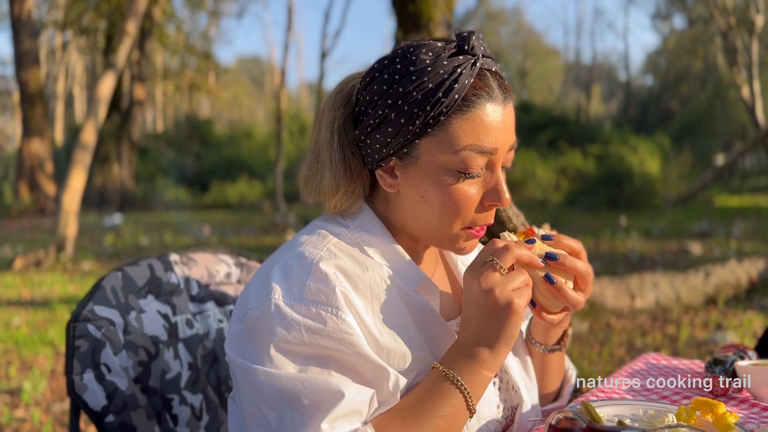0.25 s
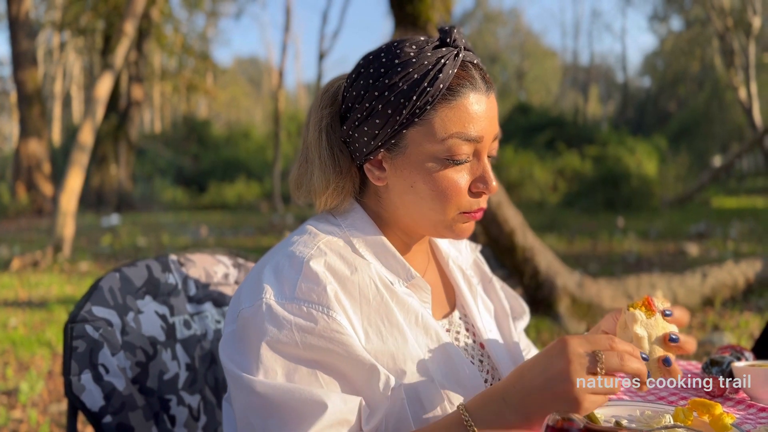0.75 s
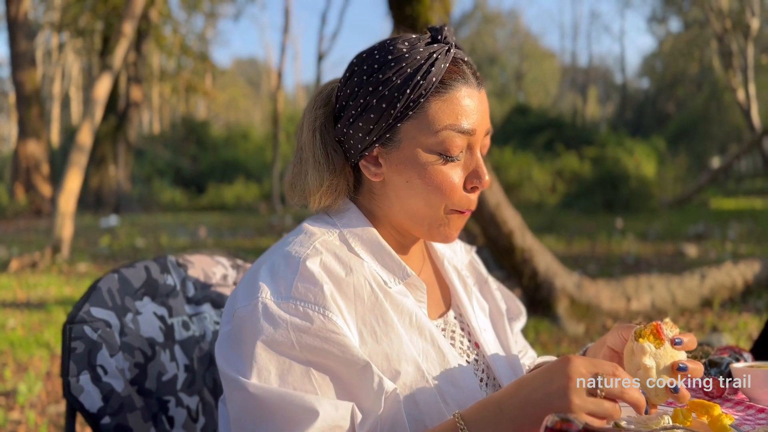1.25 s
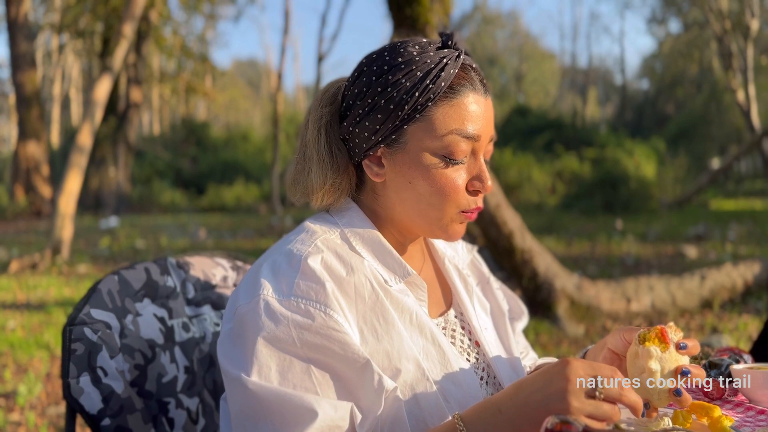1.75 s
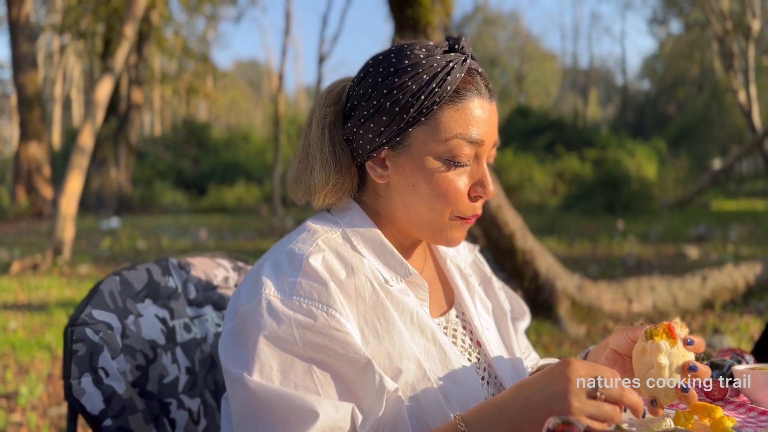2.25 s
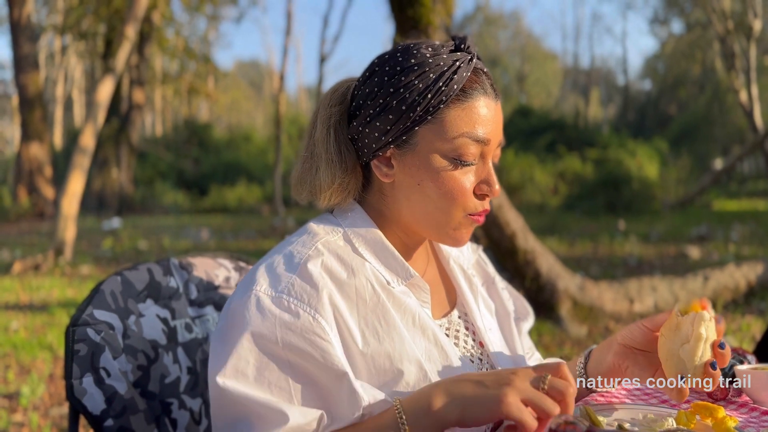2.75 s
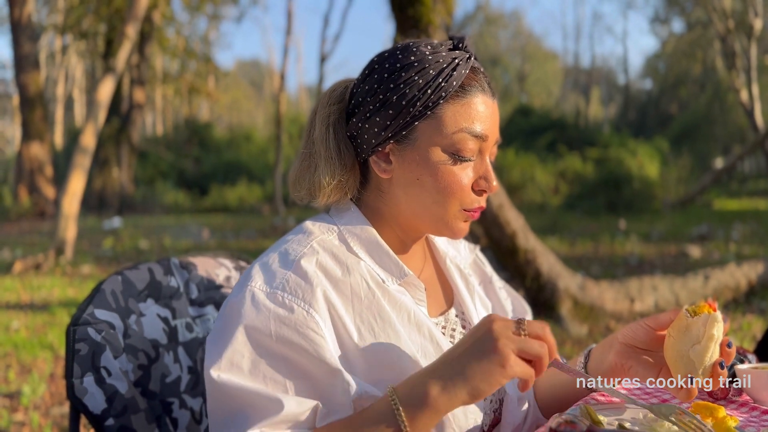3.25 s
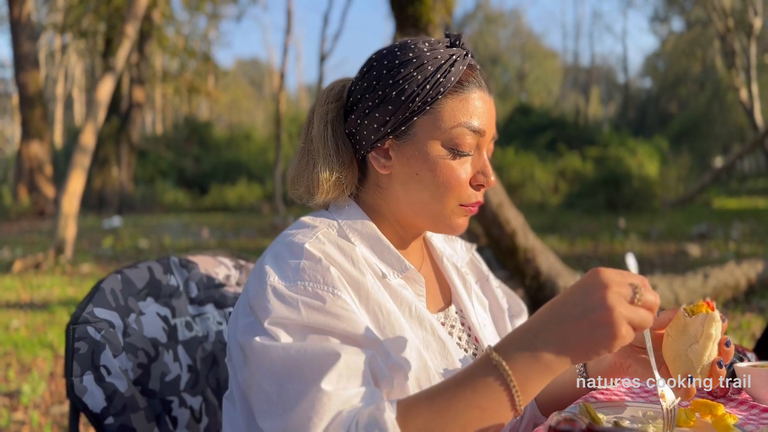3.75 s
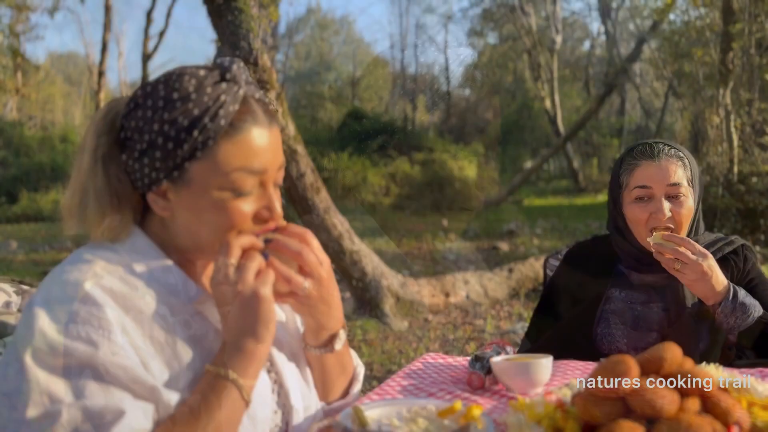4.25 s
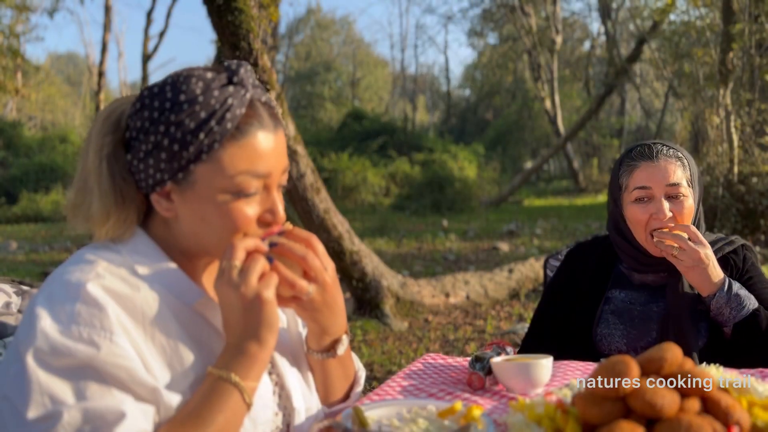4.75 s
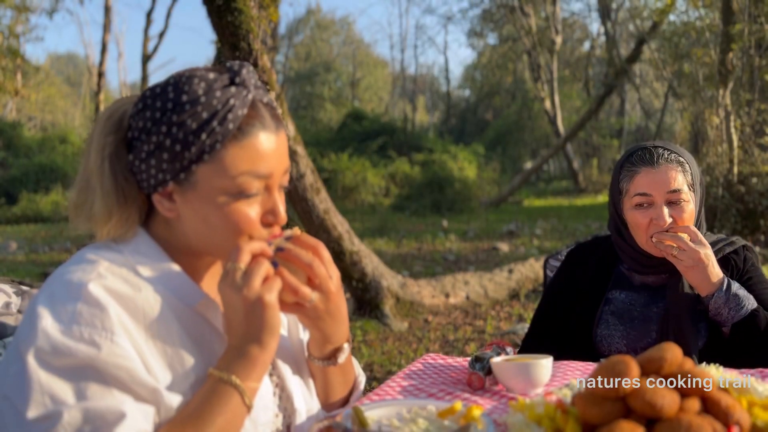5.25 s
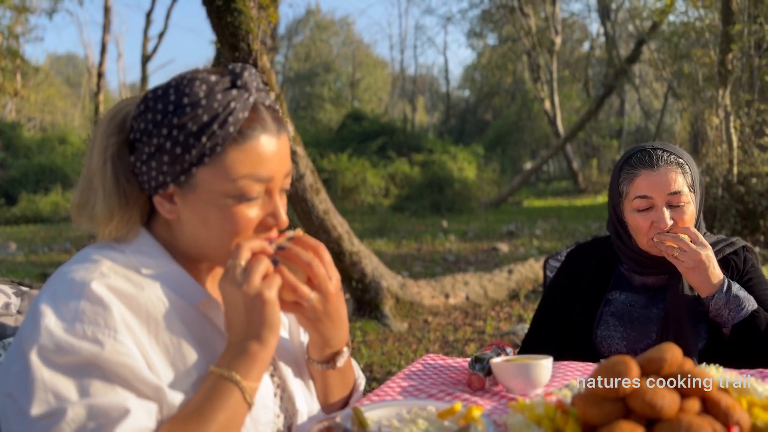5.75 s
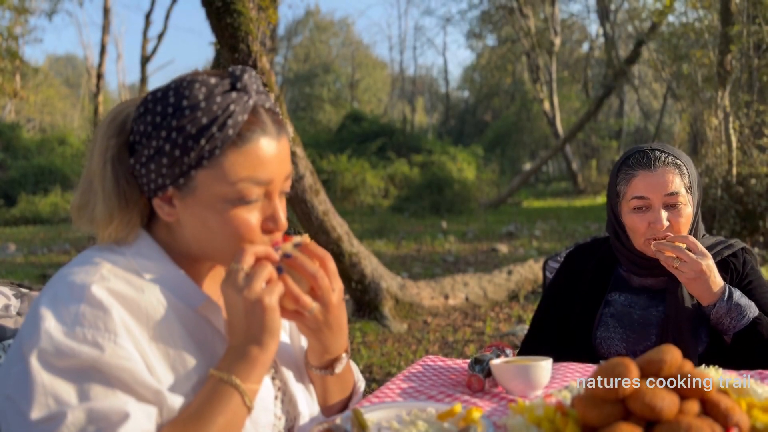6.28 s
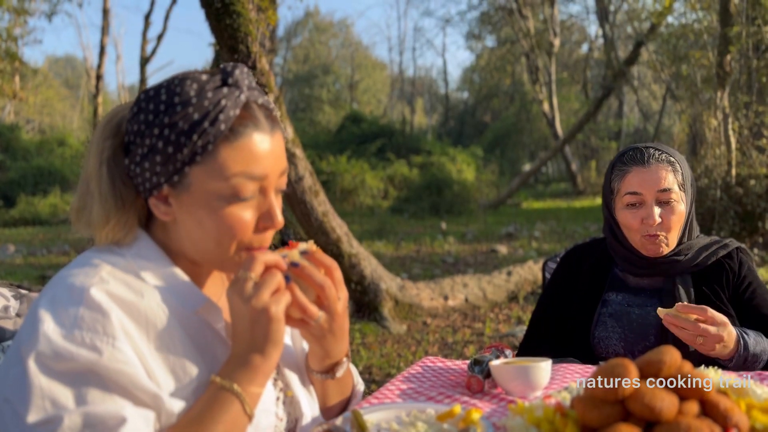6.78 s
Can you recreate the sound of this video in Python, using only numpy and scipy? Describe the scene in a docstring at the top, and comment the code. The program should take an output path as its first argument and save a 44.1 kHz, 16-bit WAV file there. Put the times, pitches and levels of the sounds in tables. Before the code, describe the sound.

Quiet woodland picnic: deep wind rumble and small table knocks first, then the rumble thins away while thin, high birdsong becomes busier.

```python
"""Birds around a woodland picnic table

Small birds near and far sing gliding, wavering sines that scatter among the trunks as dying noise.
Coloured noise makes the hiss of the wood, a dull far drone, light wind on the microphone and brushing cloth.
Short noise bursts tick on the table, rounded swings bump it, and deep sines throb in the rumble.
For about two seconds a sliding low-cut takes the rumble away."""
import sys
import numpy as np
from scipy import signal
from scipy.fft import rfft, irfft, next_fast_len
from scipy.io import wavfile

SR = 44100
rng = np.random.default_rng(int(sys.argv[2]) if len(sys.argv) > 2 else 0)


def invert_db(level):
    """Linear amplitude ratio for a level in decibels (20 dB per decade), elementwise."""
    return 10 ** (np.asarray(level, dtype=float) / 20)


def to_wav(s):
    """Save 16-bit WAV."""
    ch = np.atleast_2d(s).T  # columns
    pcm = np.round(np.clip(ch, -1, 1) * 32767)  # PCM
    wavfile.write(sys.argv[1], SR, pcm.astype(np.int16))


N = 309582  # samples

# Colour of the wood's background hiss. Each row: frequency in Hz, relative level in dB per Hz.
WOOD_COLOUR = [(100, -30.5), (200, -30), (300, -26), (400, -34.5), (800, -37.5), (1700, -45), (3300, -45.5),
               (4600, -40.5), (6200, -32), (8000, -44.5), (9200, -68.5), (11000, -98), (12000, -98),
               (13000, -66.5)]
WOOD_DB = -60
# Left-right likeness of every noise bed. Each row: frequency in Hz, correlation from -1 to 1.
LIKENESS = [(45, .93), (130, .82), (250, .88), (700, .4), (1400, -.1), (10000, -.15), (13000, .6)]
# Lean of every noise bed to the left. Each row: frequency in Hz, left over right in dB.
NOISE_LEAN = [(60, -1), (240, 1.0), (950, -2), (3770, 5.5), (15000, 6.5)]
# Colour of the dull far drone. Each row: frequency in Hz, relative level in dB per Hz.
DRONE_COLOUR = [(60, -0.5), (130, 9), (220, 2), (320, -40)]
# Fader of the drone. Each row: time in seconds, level in dB.
DRONE_LEVEL = [(0, -61.5), (4.5, -71), (6.5, -72), (6.7, -81)]
# Colour of wind on the microphone. Each row: frequency in Hz, relative level in dB per Hz.
RUMBLE_COLOUR = [(22, -31), (33, -24), (42, 3.5), (75, 4.5), (110, -6.5), (200, -14.5), (700, -64)]
# Gusts and lulls of the wind. Each row: time in seconds, rumble level in dB.
WIND_LEVEL = [(0, -49.5), (.62, -51), (.76, -43.5), (.9, -50), (2.05, -49), (2.25, -50.5), (2.4, -42),
              (2.65, -44), (2.9, -50.5), (4.05, -46.5), (4.3, -59), (4.6, -66.5), (6.6, -67.5), (7.02, -63)]
# Deep throbs in the rumble. Each row: start in seconds, length in seconds, peak in dB.
THROBS = [(1.795, 0.22, -43), (3.261, 0.11, -38), (6.703, .18, -44.5), (6.9, .12, -54)]
THROB_HZ = 50.3
# Soft bumps through the table. Each row: start in seconds, envelope peak in dB, pitch in Hz.
BUMPS = [(0.739, -30.5, 88), (2.667, -33.5, 105), (3.449, -37, 158), (3.692, -34.5, 90.4), (3.948, -37, 94),
         (4.023, -37, 126), (4.418, -43, 232), (4.49, -49, 191), (4.602, -44.5, 223), (4.76, -52.5, 200),
         (4.93, -51, 230), (5.244, -52, 263), (5.582, -52, 163), (6.029, -51, 198)]
# Colour of brushing cloth. Each row: frequency in Hz, relative level in dB per Hz.
CLOTH_COLOUR = [(250, -11), (500, -10.5), (1100, -6), (2200, -9.5), (3500, -19.5), (9000, -26.5),
                (12000, -81)]
# Strokes of hand and cloth. Each row: loudest moment, swell and fade in seconds, level in dB.
BRUSHES = [(.62, .16, 0.12, -62), (2.74, 0.31, 0.17, -65), (3.251, 0.14, 0.34, -68.5),
           (4.59, 0.076, 0.12, -69), (6.8, 0.017, 0.022, -68)]
# Small ticks. Each row: start in seconds, peak in dB, band centre in Hz, band width in octaves.
TICKS = [(0.838, -45.5, 3900, 0.57), (0.855, -51, 3680, 0.49), (1.094, -57, 3400, .4),
         (2.411, -58.5, 2300, 0.35), (2.682, -49, 1210, 1.3), (2.892, -61, 2800, 1.2),
         (3.166, -55.5, 2280, 0.31), (3.251, -33.5, 6940, 4.6), (3.251, -44, 14300, 0.31),
         (3.251, -43.5, 470, 0.48), (4.508, -56.5, 2280, 0.43), (4.565, -54, 4100, .4),
         (4.592, -50, 1540, 2.8), (4.937, -55.5, 2570, .6), (5.163, -55, 2060, 0.48),
         (6.742, -48.5, 2800, 1.2)]
TRUNKS_T60_S = 0.72

# Most bird tables share one layout: start and length in seconds, first and last pitch in Hz, peak in dB.
# These peaks hold before panning and flutter.
# Blurred calls at the edge of hearing, in that layout.
BLURRED = [(.525, .12, 2905, 2807, -73), (.545, 0.11, 2720, 2605, -77), (1.04, 0.082, 2950, 2650, -81),
           (1.51, 0.16, 4600, 4460, -76), (3.31, 0.1, 4280, 4174, -72.5), (4.35, 0.081, 5820, 6080, -70),
           (4.64, .12, 6260, 5700, -65.5), (4.84, 0.058, 6230, 5860, -70), (5.09, 0.091, 7340, 6460, -66.5),
           (5.32, 0.2, 2230, 2713, -74)]
# Unsteady twitter, in that layout.
TWITTER = [(4.3, 0.015, 3510, 4400, -64), (4.31, 0.029, 3030, 3340, -67), (4.317, 0.028, 4340, 4320, -60.5),
           (4.337, 0.016, 4280, 3620, -56), (4.348, 0.0091, 4630, 4800, -60), (4.366, .01, 4610, 3880, -56),
           (4.4, 0.039, 4306, 3874, -58.5), (4.53, 0.032, 2930, 3450, -86.5), (4.555, .04, 3035, 3760, -60)]
# Long buzzy calls. Each row: left over right in dB, echo send in dB, and a list of breakpoints.
# Each breakpoint: time in seconds, pitch in Hz, level in dB.
BUZZES = [(4.6, 3.9, [(2.72, 7560, -54), (2.8, 7740, -52), (2.88, 8060, -58.5), (2.95, 8220, -68)]),
          (0.5, 1.3, [(2.85, 7590, -53.5), (3.05, 7640, -50.5), (3.16, 7100, -75)]),
          (0.5, 1.8, [(5.03, 9050, -77), (5.07, 8680, -55), (5.18, 8010, -50), (5.22, 7410, -46.5)])]
# Buzzy two-voiced upward flicks. Each row: start in seconds, peak in dB.
FLICKS = [(3.182, -46.5), (3.413, -49.5)]
# Lower, then upper voice of a flick. Each row: first and last pitch in Hz.
FLICK_HZ = [(5400, 7300), (6200, 8600)]
# Lengths of the lower and upper voice, in seconds.
FLICK_S = [0.0158, .035]
FLICK_LAG_S = .003  # the lower voice enters later
# A far bird on the left with a two-voiced whistle. Each row: start in seconds, peak in dB.
PAIRS = [(.69, -69), (2.2, -72.5), (3.65, -71)]
# The two voices of that whistle. Each row: first and last pitch in Hz.
PAIR_HZ = [(4920, 5000), (5400, 5430)]
PAIR_S = .1
# A bird far among the trunks that falls, holds and steps up, in the shared layout.
FAR_PHRASE = [(1.2, 0.072, 4160, 4300, -79), (1.93, 0.042, 3280, 3140, -73), (1.98, .16, 3600, 3526, -77),
              (3.65, 0.04, 3970, 3540, -61.5), (3.69, 0.031, 3506, 3547, -59),
              (3.715, 0.056, 4000, 4086, -60)]
# Lower whistles from deeper in the wood, gently gliding or falling, in the shared layout.
MELLOW = [(.93, 0.14, 3570, 3470, -78), (1.012, 0.029, 3010, 3140, -65), (1.11, 0.078, 3950, 4060, -65.5),
          (4.618, 0.076, 3410, 3506, -59), (4.68, 0.038, 3760, 3800, -63),
          (4.713, 0.028, 3394, 3530, -46.5), (4.738, 0.018, 4400, 3850, -56),
          (4.76, 0.1, 3750, 3610, -62.5), (4.865, 0.025, 3420, 3200, -64), (5.13, 0.055, 3860, 3530, -65),
          (5.33, 0.061, 4090, 3900, -61), (5.37, 0.076, 3617, 3640, -66.5), (5.955, 0.08, 3620, 3046, -56),
          (6.93, 0.073, 3774, 3920, -63.5)]
# Lower whistles that climb, in the shared layout.
CLIMBS = [(1.045, .05, 3150, 3880, -67), (5.205, 0.021, 2860, 3660, -59.5), (5.215, 0.061, 3720, 4060, -56),
          (5.275, 0.013, 4200, 4860, -53)]
# High whistles, most of them nearly level, in the shared layout.
LEVEL_HIGH = [(4.36, .09, 7320, 7600, -62), (4.36, 0.069, 7310, 7120, -62), (4.714, .03, 8300, 7900, -46),
              (4.965, 0.058, 8550, 8280, -60), (5.89, 0.16, 8430, 6730, -70.5),
              (5.99, 0.36, 7720, 7430, -61), (6.1, 0.075, 7000, 6950, -60),
              (6.935, 0.087, 8290, 8340, -65.5)]
# Thin high whistles that fall, in the shared layout.
SEEPS = [(2.49, .23, 8590, 7600, -60), (3.95, 0.15, 8770, 8020, -67.5), (4.19, .074, 9250, 7850, -45.5),
         (4.62, .045, 8800, 8350, -64), (4.655, 0.058, 9220, 7950, -38.5), (4.905, .075, 9030, 8280, -57.5),
         (6.66, 0.13, 9300, 8730, -71), (6.77, .09, 8960, 8000, -65)]
# Quick whistles, nearly all dropping in pitch, in the shared layout.
DROPS = [(6.5, 0.044, 5780, 4130, -44), (6.665, 0.052, 6010, 2990, -48), (6.67, 0.027, 5410, 3020, -56),
         (6.67, 0.021, 5790, 5810, -52.5), (6.803, 0.019, 5710, 5290, -50), (6.805, .045, 5620, 3210, -50),
         (6.805, 0.039, 4840, 3010, -55)]
# Near calls. Each row: left over right in dB, echo send in dB, and a list of breakpoints.
# Each breakpoint: time in seconds, pitch in Hz, level in dB.
NEAR_CALLS = [(8, 3.5, [(5.69, 8190, -56), (5.7, 7330, -45), (5.715, 6520, -47), (5.73, 6320, -54)]),
              (24, -4, [(6.12, 6470, -53), (6.2, 6170, -54.5), (6.29, 5890, -58.5), (6.36, 5940, -57.5),
              (6.49, 6055, -56)])]

# Lag of the left side in the bass. Each row: frequency in Hz, phase in radians.
LEFT_LAG = [(45, .15), (130, .75), (300, .55), (700, 1.4), (1500, 0)]
# Slide of the low-cut. Each row: time in seconds, corner in Hz.
LOW_CUT = [(4.5, 29.2), (4.66, 161), (5.2, 160), (5.4, 260), (5.6, 126), (5.8, 194), (6.0, 104),
           (6.15, 207), (6.63, 164), (6.71, 30.6)]
TOP_HZ = 15760


def rms_one(x):
    """Scale to unit rms."""
    return x / np.sqrt(np.mean(x ** 2) + 1e-20)


def in_time(rows):
    """Read a (seconds, value) curve at every sample."""
    return np.interp(np.arange(N) / SR, *np.transpose(rows))


def at_hz(points, hz):
    """Read a (Hz, value) curve on a log-frequency axis."""
    curve_hz, values = np.transpose(points)
    return np.interp(np.log(hz), np.log(curve_hz), values)


def lean_left(db):
    """Gains of left and right, db apart."""
    return invert_db(np.array([[.5], [-.5]]) * db)


def drift(rate_hz, size=N):
    """Slow random motion of unit rms: noise through a two-pole low-pass, drawn every 40 samples."""
    r = np.exp(-80 * np.pi * rate_hz / SR)
    chance = rng.standard_normal(size // 40 + 2002)
    slow = signal.lfilter([1], [1, -2 * r, r * r], chance)[2000:]  # skip the filter's settling
    return np.interp(np.arange(size) / 40, np.arange(len(slow)), rms_one(slow))


def air_noise(colour, patchy_db, rate_hz):
    """Stereo noise of a given colour, in half-octave bands that flicker both together and alone."""
    size = next_fast_len(N)
    hz = np.maximum(np.fft.rfftfreq(size, 1 / SR), 1)
    alike = np.clip(at_hz(LIKENESS, hz), -1, 1)
    mid, side = rfft(rng.standard_normal((2, size))) * invert_db(at_hz(colour, hz))
    pair = np.sqrt(1 + alike) * mid + np.sqrt(1 - alike) * side * [[1], [-1]]
    pair = pair * lean_left(at_hz(NOISE_LEAN, hz))
    low_hz, high_hz = colour[0][0], colour[-1][0]
    step = np.clip(2 * np.log2(hz / low_hz), 0, 2 * np.log2(high_hz / low_hz))
    together = drift(rate_hz / 4)
    out = 0
    for k in range(int(step.max()) + 2):
        overlap = np.clip(1 - abs(step - k), 0, 1)  # neighbouring bands crossfade
        band = irfft(pair * overlap, size)[:, :N]
        out = out + band * invert_db(patchy_db * (2.2 * together + drift(rate_hz)))
    return rms_one(out)


def wood_hiss():
    """The wood's background with its far chorus: steady coloured noise, hissing in the treble."""
    return invert_db(WOOD_DB) * air_noise(WOOD_COLOUR, patchy_db=.8, rate_hz=3)


def far_drone():
    """A dull drone of low, patchy noise under a moving fader."""
    return invert_db(in_time(DRONE_LEVEL)) * air_noise(DRONE_COLOUR, patchy_db=3, rate_hz=14)


def wind():
    """Wind on the microphone: deep noise that swells with each gust."""
    return invert_db(in_time(WIND_LEVEL)) * air_noise(RUMBLE_COLOUR, patchy_db=0.5, rate_hz=30.0)


def throbs():
    """Several cycles of one deep sine that swell and fade."""
    out = np.zeros(N)
    for s, length_s, peak_db in THROBS:
        t = np.arange(round(length_s * SR)) / SR
        swell = np.sqrt(np.sin(np.pi * t / length_s))
        out[round(s * SR):][:len(t)] += invert_db(peak_db) * swell * np.sin(2 * np.pi * THROB_HZ * t)
    return out


def bumps(cycles=2.7):
    """A short rounded swing of the table top: a low sine that rises fast and dies away."""
    out = np.zeros(N)
    for s, peak_db, hz in BUMPS:
        t = np.arange(round(3 * cycles / hz * SR)) / SR
        rise = t * hz / (cycles / 4)
        envelope = rise * np.exp(1 - rise)  # peaks at 1
        out[round(s * SR):][:len(t)] += invert_db(peak_db) * envelope * np.sin(2 * np.pi * hz * t)
    return out


def brushing_cloth():
    """Hands and cloth: noise whose strokes swell and fade, down 20 dB at the swell and fade times."""
    t = np.arange(N) / SR
    strokes = 0
    for s, swell_s, fade_s, level_db in BRUSHES:
        away = np.where(t < s, (s - t) / swell_s, (t - s) / fade_s)
        strokes = strokes + invert_db(level_db - 20 * away ** 2.4)
    return strokes * air_noise(CLOTH_COLOUR, patchy_db=1.5, rate_hz=13)


def ticks(decay_s=0.002):
    """A burst of noise dying in a couple of milliseconds, in a band of its own."""
    out = np.zeros(N)
    decay = np.exp(-np.arange(1024) / SR / decay_s)
    for s, peak_db, hz, octaves in TICKS:
        band = np.clip(hz * 2 ** (np.array([-.5, .5]) * octaves), 50, .45 * SR)
        band_pass = signal.butter(2, band, "band", fs=SR, output="sos")
        tick = signal.sosfilt(band_pass, rng.standard_normal(1024) * decay)
        out[round(s * SR):][:1024] += invert_db(peak_db) * tick / abs(tick).max()
    return out


def scatter(x, t60_s, onset_s):
    """Many surfaces scatter sound back: dying noise, unrelated at the two sides."""
    t = np.arange(SR) / SR
    tail = rng.standard_normal((2, SR)) * invert_db(-60 * t / t60_s) * np.clip(t / onset_s, 0, 1)
    tail = tail / np.sqrt(np.sum(tail ** 2, axis=1, keepdims=True))
    return signal.fftconvolve(x, tail, axes=1)[:, :N]


def glides(rows, pan_db, echo_db, bend, loudest, start_db, end_db, db_per_octave=0):
    """Pitch moves as (share of the note) ** bend; level swells to its loudest share, then may fade."""
    share = np.linspace(0, 1, 12)
    peak_at = np.clip(loudest, .02, .98)
    swell_db = np.interp(share, [0, peak_at, 1], [min(start_db, 0), 0, min(end_db, 0)])
    notes = []
    for s, length_s, from_hz, to_hz, peak_db in rows:
        hz = from_hz + (to_hz - from_hz) * share ** bend
        level_db = peak_db + swell_db + db_per_octave * np.log2(hz / from_hz)
        notes.append((pan_db, echo_db, np.transpose([s + length_s * share, hz, level_db])))
    return notes


def sing(notes, waver, waver_hz, flutter_db, octave_db=-np.inf, edge_s=0.00067):
    """Gliding, wavering near-sines (waver a share of pitch); returns direct sound and echo send."""
    direct, sent = np.zeros((2, N)), np.zeros((2, N))
    for pan_db, echo_db, rows in notes:
        s, hz, level_db = np.transpose(rows)
        start, end = round(s[0] * SR), min(round(s[-1] * SR), N)
        t = np.arange(start, end) / SR
        pitch_hz = np.interp(t, s, hz) * (1 + waver * drift(waver_hz, size=len(t)))
        phase = 2 * np.pi * np.cumsum(pitch_hz) / SR
        edges = np.clip(np.minimum(t - s[0], s[-1] - t) / edge_s, 0, 1)
        note = np.sin(phase) + invert_db(octave_db) * np.sin(2 * phase)
        note = note * edges * invert_db(np.interp(t, s, level_db) + flutter_db * drift(43, size=len(t)))
        sides = lean_left(pan_db)
        direct[:, start:end] += sides / sides.mean() * note
        sent[:, start:end] += invert_db(echo_db) * np.sqrt(sides) * note
    return np.array([direct, sent])


def far_flock(count):
    """Notes of distant birds at random, barely out of the hiss: short whistles heard mostly as echo."""
    notes = []
    for when, pitch, glide, length, side, loud in rng.random((count, 6)):
        s, length_s = when * (N / SR - .2), .03 + .12 * length
        hz, level_db = 4400 * 2 ** (.8 * pitch), -81 + 6 * loud
        end_hz = hz * (.94 + .1 * glide)
        notes.append((12 * side - 4, 5, [(s, hz, level_db), (s + length_s, end_hz, level_db)]))
    return notes


def blurred_calls():
    """Faint wavering calls, sent more to the trunks than to the ear."""
    notes = glides(BLURRED, pan_db=-7.0, echo_db=6.0, bend=.9, loudest=0.96, start_db=-1, end_db=-1.0)
    return sing(notes, waver=0.0152, waver_hz=67, flutter_db=4.5)


def twitter():
    """Rapid short glides, unsteady through a wide pitch waver."""
    notes = glides(TWITTER, pan_db=1.0, echo_db=5.0, bend=0.875, loudest=0.27, start_db=1.5, end_db=-0.5)
    return sing(notes, waver=0.0294, waver_hz=72, flutter_db=1.0)


def buzzes():
    """Long calls roughened by fast pitch waver, with a faint octave."""
    return sing(BUZZES, waver=0.0119, waver_hz=155, flutter_db=-1.0, octave_db=-24)


def flicks():
    """Buzzy two-voiced upward glides; the upper voice is heard mostly as echo."""
    low, high = [[(s + lag_s, length_s, *hz, peak_db) for s, peak_db in FLICKS]
                 for hz, length_s, lag_s in zip(FLICK_HZ, FLICK_S, [FLICK_LAG_S, 0])]
    notes = (glides(low, pan_db=8.5, echo_db=-2.5, bend=.35, loudest=0.32, start_db=8.0, end_db=-6)
             + glides(high, pan_db=3.5, echo_db=10.5, bend=0.199, loudest=0.029, start_db=-6.0, end_db=-7.5))
    return sing(notes, waver=0.015, waver_hz=190, flutter_db=1.0, octave_db=-27)


def whistles():
    """Clear near-sines, each kind from its own place, with the far flock behind them."""
    pairs = [(s, PAIR_S, *hz, peak_db) for s, peak_db in PAIRS for hz in PAIR_HZ]
    notes = far_flock(count=30)
    notes += glides(pairs, pan_db=22.0, echo_db=4.0, bend=0.82, loudest=0.35, start_db=3.0, end_db=-9)
    notes += glides(FAR_PHRASE, pan_db=5, echo_db=6.5, bend=0.78, loudest=0.45, start_db=-3.0, end_db=3.0)
    notes += glides(MELLOW, pan_db=-0.5, echo_db=-1.5, bend=0.81, loudest=0.45, start_db=-0.5, end_db=-6.0)
    notes += glides(CLIMBS, pan_db=-9, echo_db=-1.5, bend=0.42, loudest=.45, start_db=0, end_db=0.0)
    notes += glides(LEVEL_HIGH, pan_db=-4.0, echo_db=0.6, bend=0.7, loudest=0.96, start_db=-3.0, end_db=0.5)
    notes += glides(SEEPS, pan_db=5.5, echo_db=-2.5, bend=.6, loudest=0.35, start_db=-15, end_db=-4.5)
    notes += glides(DROPS, pan_db=14, echo_db=0.0, bend=0.68, loudest=0.11, start_db=2, end_db=-1.0,
                    db_per_octave=20.0)
    notes += NEAR_CALLS
    return sing(notes, waver=.003, waver_hz=150, flutter_db=2.5, octave_db=-49)


def scene():
    """Birds and table sounds in the wood's echo, over wind and background."""
    ground = (wind() + far_drone() + bumps() + throbs()) * lean_left(1.2)
    table = ticks()
    direct, sent = blurred_calls() + twitter() + buzzes() + flicks() + whistles()
    leaves = invert_db(-8) * scatter(direct, 0.2, 0.0067)  # foliage near the singers blurs each note
    trunks = scatter(sent + invert_db(-21) * table, TRUNKS_T60_S, 0.005)
    return wood_hiss() + ground + brushing_cloth() + table + trunks + leaves + direct


def top_cut(x):
    """Nothing passes above the cut-off."""
    return signal.sosfilt(signal.butter(12, 15760, fs=SR, output="sos"), x)


def record(dry, slope=5.3):
    """Two close ports shift the bass between the sides; a steep low-cut slides and the top is cut."""
    hz, s, frames = signal.stft(dry, SR, nperseg=4096, noverlap=3584)
    corner_hz = np.interp(s, *np.transpose(LOW_CUT))
    frames[0] *= np.exp(-1j * at_hz(LEFT_LAG, hz + 1))[:, None]
    hz = hz[:, None]
    low_cut = 1 / np.sqrt(1 + (corner_hz / (hz + 1)) ** (2 * slope))
    frames = frames * (hz < TOP_HZ) * low_cut
    mix = signal.istft(frames, SR, nperseg=4096, noverlap=3584)[1][:, :N]
    return top_cut(mix)


dry = scene()
out = record(dry)
to_wav(out)
```